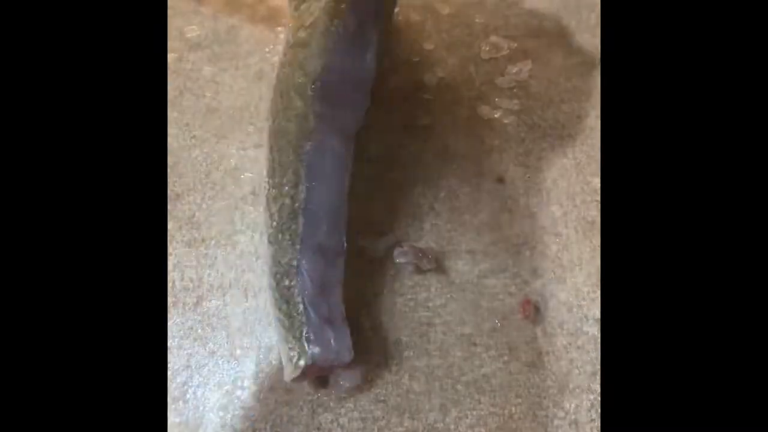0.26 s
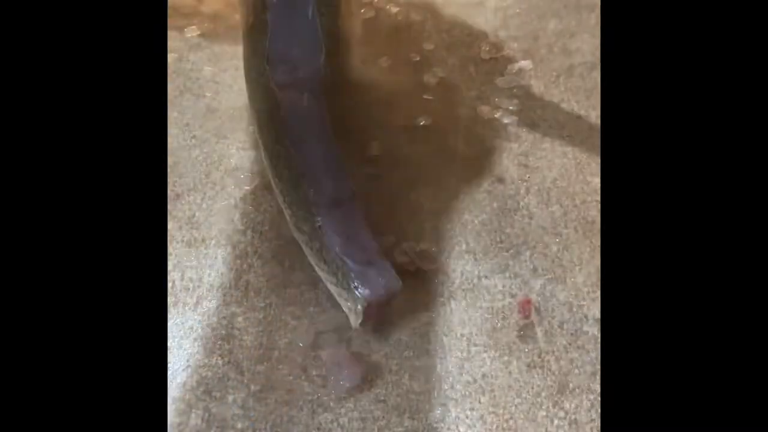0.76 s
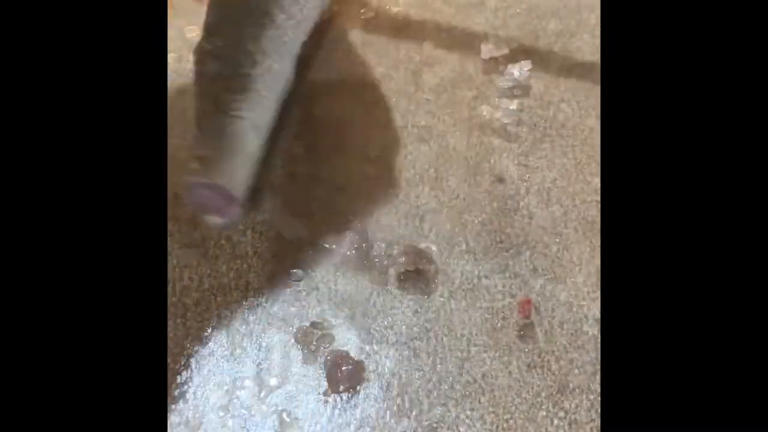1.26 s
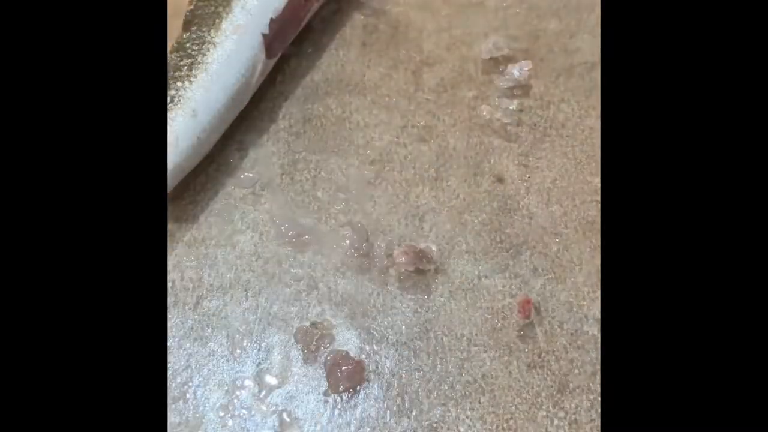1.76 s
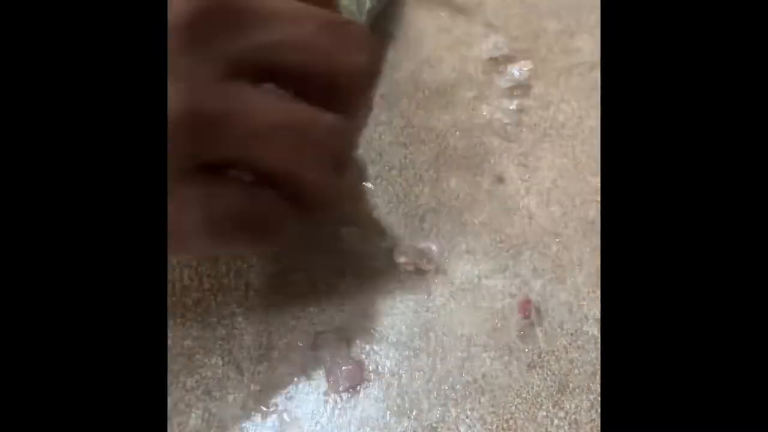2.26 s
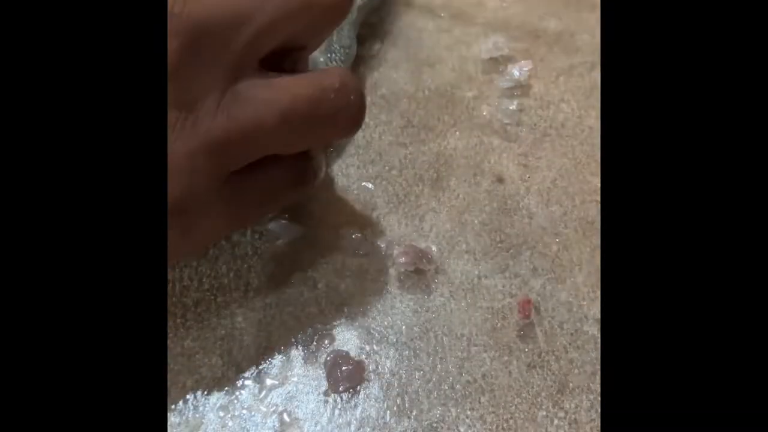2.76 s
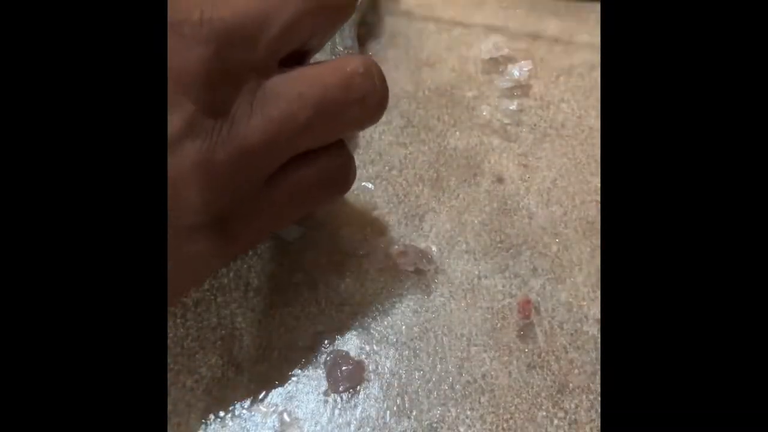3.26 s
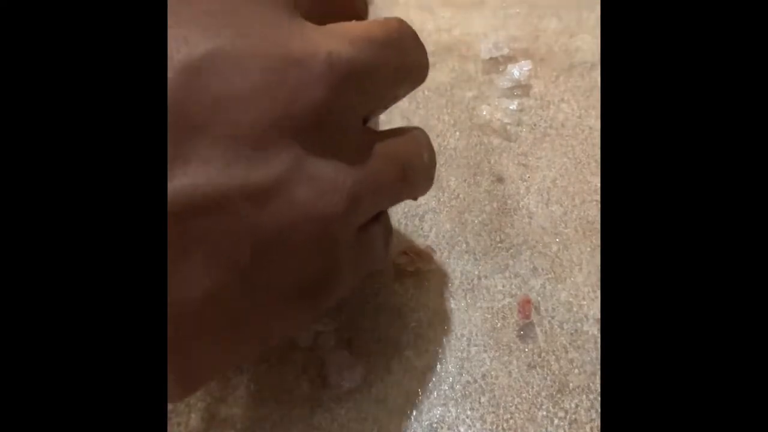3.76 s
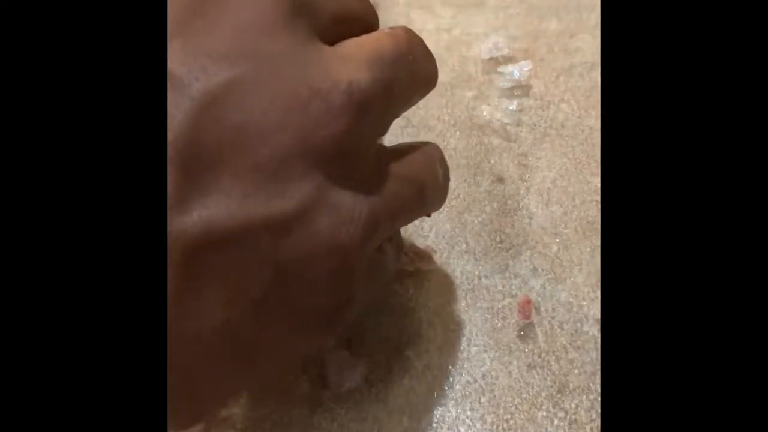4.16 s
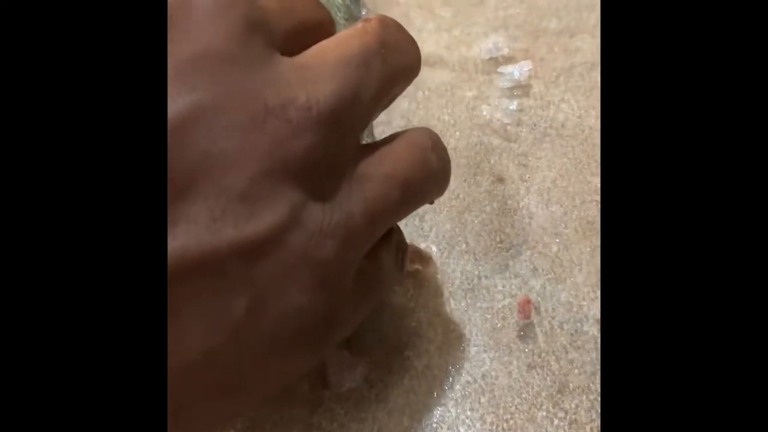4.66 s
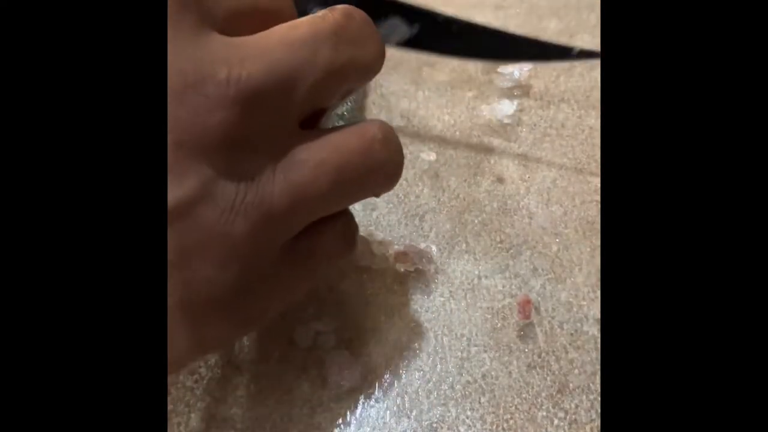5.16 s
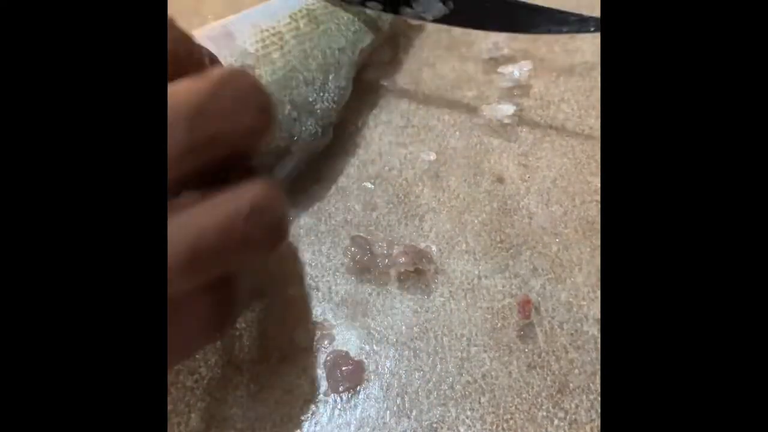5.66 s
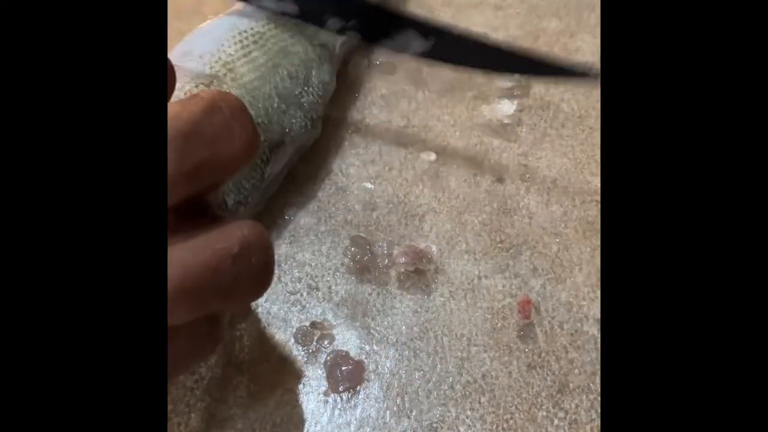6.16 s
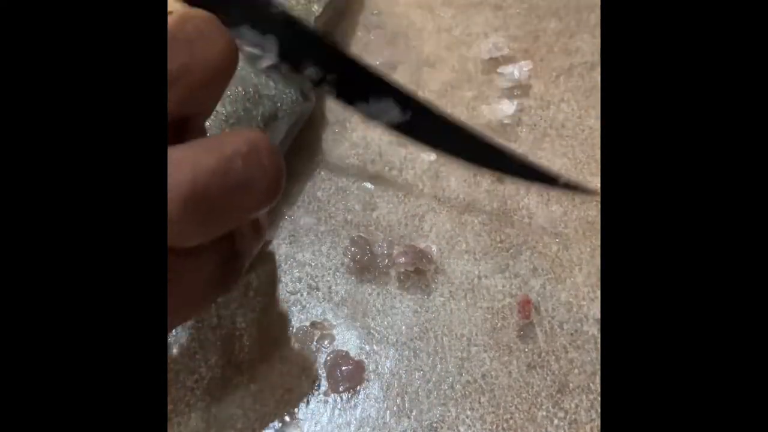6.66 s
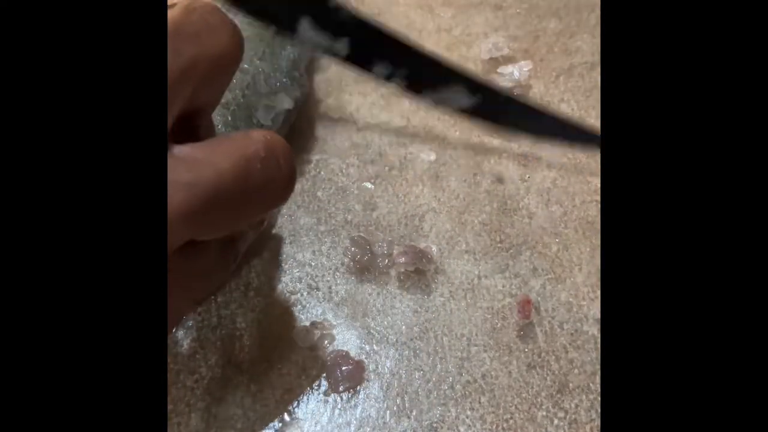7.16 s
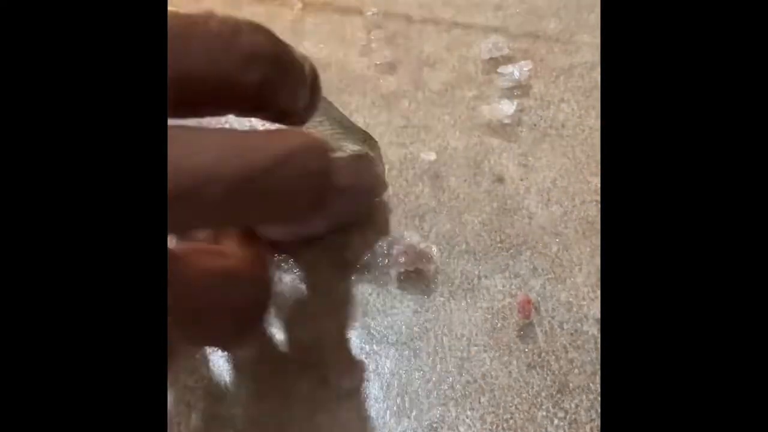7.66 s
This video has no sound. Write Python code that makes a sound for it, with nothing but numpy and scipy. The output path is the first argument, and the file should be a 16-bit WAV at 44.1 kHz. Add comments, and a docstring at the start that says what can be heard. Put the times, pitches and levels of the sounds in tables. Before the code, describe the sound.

A wet fish is handled on a kitchen counter, its skin fizzing and smacking before a dull slap. A knife then scrapes off the scales in quick, crisp strokes, each jolting the counter, with a few hollow knocks midway. Near the end the steel blade skids and rings, and the flesh squelches. A faint hum, softly running water and a briefly heard distant engine lie behind the close sounds.

```python
"""A knife scrapes the scales off a fish on a wet counter. At first a far engine drones and fades, while
an appliance hums and water runs softly throughout. Wet skin fizzes and smacks as the fish is handled, the
knife tip ticks, and the fish slaps down. From 2.5 s the edge rasps off scales, seven or eight strokes a
second, jolting the counter. Around 4 s the fish knocks hollowly and the water swells once. Near 7 s the
steel blade skids twice on the hard top and rings, and the gripped flesh squelches."""
import sys
import numpy as np
from scipy import signal
from scipy.fft import rfft, irfft, next_fast_len
from scipy.io import wavfile
from scipy.ndimage import uniform_filter1d

SR = 44100
rng = np.random.default_rng(int(sys.argv[2]) if len(sys.argv) > 2 else 0)


def dump_mix(stems):
    """Bounce the given channels to the path in sys.argv[1] as a 16-bit WAV at rate SR."""
    frames = np.atleast_2d(stems).T  # one column per channel
    limited = np.clip(frames, -1, 1)  # hard clip at full scale
    pcm = np.round(limited * 32767).astype(np.int16)
    wavfile.write(sys.argv[1], SR, pcm)


N = 348831
T = np.arange(N) / SR


def gain_of(db):
    """Turns decibels into amplitude."""
    return 10 ** (np.asarray(db) / 20)


def evened(x):
    """Scales a signal to an average power of 1."""
    return x / np.sqrt(np.mean(x ** 2) + 1e-20)


def steadied(x, size=900):
    """Holds the power near 1 over every stretch of `size` samples."""
    return x / np.sqrt(np.abs(uniform_filter1d(x ** 2, size)) + 1e-9)


def read(points, hz):
    """Reads between (frequency, value) points on a log-frequency axis."""
    f, value = np.transpose(points)
    return np.interp(np.log(hz + 1), np.log(f + 1), value)


def wander(rate):
    """Smooth random motion, up to about `rate` wiggles a second."""
    hz = np.fft.rfftfreq(N, 1 / SR)
    return evened(irfft(rfft(rng.standard_normal(N)) * np.exp(-(hz / rate) ** 2), N))


def crackle(rate, spread_db):
    """Tiny random clicks of uneven size, about `rate` a second."""
    size = gain_of(spread_db * np.minimum(rng.exponential(1, N), 4)) * rng.choice([-1, 1], N)
    return evened(size * (rng.random(N) < rate / SR))


def swells(times, lengths, dbs, edge=2):
    """Loudness curve of pushes that rise and fall; a higher edge makes them more abrupt."""
    power = np.zeros(N)
    for s, length, db in zip(times, lengths, dbs):
        near = slice(max(int((s - 2 * length) * SR), 0), int((s + 2 * length) * SR))
        power[near] += gain_of(db) ** 2 * .5 ** (abs(2 * (T[near] - s) / length) ** edge)
    return np.sqrt(power)


def pats(rows):
    """Loudness curve of sudden contacts that die away."""
    out = np.zeros(N)
    for s, decay, db in rows:
        part = out[round(s * SR):][:SR // 3]
        part += gain_of(db) * np.exp(-T[:len(part)] / decay)
    return out


def body(spectrum, modes=(), size=4096):
    """How an object answers one tap: a broad colour (Hz, dB) plus ringing notes (Hz, width in Hz, dB)."""
    hz = np.fft.rfftfreq(size, 1 / SR)
    power = gain_of(read(spectrum, hz)) ** 2
    for f, width, db in modes:
        power = power + gain_of(db) ** 2 / (1 + (2 * (hz - f) / width) ** 2)
    log_gain = np.log(np.r_[power, power[-2:0:-1]]) / 2
    response = np.fft.ifft(np.exp(np.conj(signal.hilbert(log_gain)))).real  # no sound before the tap
    return response / np.linalg.norm(response)


def convolve(x, response):
    """Plays a signal through an object's response."""
    return signal.oaconvolve(x, response)[:N]


def shifting(x, depth_db, size=11):
    """The gaps between blade, fingers and fish keep changing, so narrow resonances come and go."""
    spectra = signal.stft(x, nperseg=256, noverlap=192)[2]
    patches = rng.standard_normal(spectra.shape[::-1]).T
    patches = evened(uniform_filter1d(uniform_filter1d(patches, 2 * size, axis=1), size, axis=1))
    patches = evened(patches + np.roll(patches, 1, axis=0))
    return signal.istft(spectra * evened(gain_of(depth_db * patches)), nperseg=256, noverlap=192)[1][:N]


def diffuse(pair):
    """Makes two unrelated signals as alike as sound from all sides is at the two microphone ports."""
    a, b = rfft(pair)
    hz = np.fft.rfftfreq(pair.shape[1], 1 / SR)
    same = np.clip(read(np.array(MIC_PORTS)[:, :2], hz), -1, 1)
    return irfft(np.array([a, same * a + np.sqrt(1 - same ** 2) * b]), pair.shape[1])


def wash(spectrum):
    """Noise of a given colour, arriving from all sides."""
    response = body(spectrum)
    return evened(diffuse(np.array([convolve(rng.standard_normal(N), response) for _ in range(2)])))


def kitchen(x, early_db, late_db, early_t60=0.038, late_t60=0.2, moves_hz=1.3):
    """Adds quick echoes and a room tail that change as the hands move; t60 is seconds to fade 60 dB."""
    t = T[:SR // 5]
    turn = 2 * np.pi * moves_hz * T
    out = np.array([x, x])
    for share in (np.cos(turn), np.sin(turn)):
        response = np.zeros((2, len(t)))
        for db, t60, build_s in ((early_db, early_t60, .001), (late_db, late_t60, .012)):
            tail = diffuse(rng.standard_normal((2, len(t))))
            tail *= gain_of(-60 * t / t60) * (1 - np.exp(-t / build_s))
            response += gain_of(db) * tail / np.linalg.norm(tail[0])
        out = out + signal.oaconvolve((x * share)[None], response, axes=1)[:, :N]
    return out / np.sqrt(1 + gain_of(early_db) ** 2 + gain_of(late_db) ** 2)


# The colour of the quiet room. Each row: frequency in Hz, relative level in dB.
ROOM_COLOUR = [(25, 6), (60, -26.5), (100, 1.5), (140, 0), (230, -3.5), (320, -12), (600, -13),
               (900, -16.5), (1250, -26), (2000, -19.5), (3000, -23.5), (4500, -27.5), (9000, -30),
               (16000, -60)]
def room_tone(level_db=-56.5):
    """A faint, low rush fills the room."""
    return gain_of(level_db) * wash(ROOM_COLOUR)


# The engine's speed. Each row: time in seconds, firings a second.
ENGINE_SPEED = [(0.0, 71), (0.134, 70.3), (0.238, 75), (1.15, 73.4), (1.454, 69.2), (1.862, 69), (1.95, 68)]
# Its tones. Each row: multiple of the firing rate, relative level in dB.
ENGINE_TONES = [(2, -35), (3, -2), (4, -30.5), (5, -25.5)]
def engine(loudest_s=0.089, pass_s=1.87, level_db=-43.5, flutter_db=0.9):
    """The firings of a far engine blend into a drone that eases off and fades."""
    firing_hz = np.interp(T, *np.transpose(ENGINE_SPEED)) * (1 + 0.001 * wander(rate=20))
    turns = np.cumsum(firing_hz) / SR
    drone = sum(gain_of(db) * np.sin(2 * np.pi * round(k) * turns) for k, db in ENGINE_TONES)
    loudness = swells([loudest_s], [pass_s], [level_db]) * gain_of(flutter_db * wander(rate=32))
    return np.sqrt(2) * drone * loudness


# The appliance's tones. Each row: pitch in Hz, level in dB.
HUM_TONES = [(106.4, -56), (146, -72), (246, -68), (569, -74.5), (601, -74.5)]
# How the hum weakens. Each row: time in seconds, change in dB.
HUM_FADE = [(0, 0), (5.5, -0.5), (7.9, -3.5)]
def appliance(waver_db=1.0, drift_hz=1.0):
    """An appliance hums with a few tones that waver in loudness and pitch."""
    hum = np.zeros(N)
    for hz, db in HUM_TONES:
        loudness = gain_of(db + waver_db * wander(rate=16))
        turns = np.cumsum(hz + drift_hz * wander(rate=4.5)) / SR
        hum += loudness * np.sin(2 * np.pi * turns)
    return np.sqrt(2) * hum * gain_of(np.interp(T, *np.transpose(HUM_FADE)))


# The colour of running water. Each row: frequency in Hz, relative level in dB.
FLOW_COLOUR = [(150, -8.5), (300, 1), (480, -1.5), (680, 0), (1200, -10.5), (1900, -3.5), (3700, -14),
               (8000, -44), (16000, -33.5)]
def water(trickle_db=-70.5, gush_at_s=3.75, gush_s=0.75, gush_db=-55, splash_db=1.5):
    """Water runs softly throughout and swells once into a splashy gush."""
    gush = swells([gush_at_s], [gush_s], [gush_db], edge=0.98) * gain_of(splash_db * wander(rate=49))
    trickle = gain_of(trickle_db + 0.81 * wander(rate=17))
    return wash(FLOW_COLOUR) * np.hypot(trickle, gush)


# The fingers slip. Each row: middle in seconds, length in seconds, relative level in dB.
FINGER_SLIDES = [(0.624, 0.075, -59), (1.006, 0.26, -62.5), (1.239, 0.25, -55.5), (1.583, 0.3, -65.5),
                 (2.052, 0.23, -49.5), (2.27, 0.12, -53.5), (3.257, 1.43, -57), (5.29, 0.46, -55.5),
                 (5.796, 0.1, -54.5), (6.4, 1.4, -65), (7.068, 0.7, -63.5), (7.467, 0.12, -50),
                 (7.824, 0.16, -57)]
def sliding_skin(gain_db=-1, hold_db=-69.5, patchy_db=3, clump_db=-2.5):
    """Wet skin fizzes in sticky clumps under the holding hand, louder when it slides."""
    slip = np.hypot(gain_of(hold_db), swells(*np.transpose(FINGER_SLIDES), edge=4.5))
    fizz = slip * gain_of(gain_db + patchy_db * wander(rate=5.7)) * crackle(rate=1400, spread_db=3.5)
    clumps = evened(gain_of(clump_db * wander(rate=150)))
    fizz = shifting(fizz * clumps, depth_db=4)
    skin = body([(400, -20), (1200, -9.5), (2200, -1.5), (4000, 0), (8000, 1), (11000, 3), (15500, 4.5),
                 (16200, 0.5)], [(7520, 120, 9), (4740, 400, 0.99)])
    return kitchen(convolve(fizz, skin), early_db=-5, late_db=-16)


# The loudest single scales snapping off. Each row: time in seconds, level in dB.
SCALE_SNAPS = [(.955, -37), (2.058, -32), (2.412, -41), (2.513, -30), (2.823, -31), (2.9257, -41),
               (3.0642, -33), (3.188, -31), (3.308, -33), (3.4306, -37), (3.602, -28), (3.759, -32),
               (3.89, -31), (4.17, -32), (4.303, -40), (4.465, -36), (4.615, -30), (4.623, -30),
               (4.745, -32), (4.8598, -31.5), (4.8727, -29.5), (4.9895, -35), (5.152, -36), (5.2649, -21),
               (5.522, -23), (5.965, -43), (6.205, -39), (6.35, -35), (6.492, -35), (6.632, -35),
               (6.6934, -27), (6.812, -37)]
def snapping_scales(break_s=0.00052):
    """A stiff scale breaks free with one bright click that pings the blade."""
    s, db = np.transpose(SCALE_SNAPS)
    breaks = swells(s, np.full(len(s), break_s), db) * rng.standard_normal(N)
    ping = body([(600, -4.5), (3000, -14), (8000, 2.5), (13000, 3.5), (16000, 4)],
                [(3070, 35, 0), (3770, 64, 6)])
    return kitchen(convolve(breaks, ping), early_db=-1.5, late_db=-40)


# Wet skin smacks. Each row: start in seconds, level in dB, air pocket's pitch in Hz, its ring time in
# seconds, click level relative to the pocket in dB, tearing time in seconds.
SKIN_SMACKS = [(1.044, -40.5, 1880, 0.033, -2, 0.0084), (1.046, -38.5, 7530, 0.033, -22, 0.0076),
               (1.117, -33, 3910, 0.033, -5, 0.016), (1.482, -45.5, 4850, 0.044, 6.5, 0.012),
               (1.556, -48.5, 7160, 0.021, 2, 0.011), (1.627, -47, 3650, 0.0091, -8.5, 0.028),
               (1.924, -37.5, 4400, 0.0037, -15, 0.028), (2.175, -31.5, 4030, 0.036, -9, 0.014),
               (2.255, -43.5, 1847, 0.023, 0, 0.022), (2.285, -38.5, 4040, 0.0036, -25, 0.043),
               (2.469, -41.5, 7400, 0.029, -4.5, 0.0085), (2.725, -35.5, 1025, 0.0024, -13.5, 0.027),
               (7.42, -36.5, 2695, 0.024, -19, 0.012)]
def smacks(neighbours_db=-8, rise_per_s=0.47):
    """A film of water tears: a spatter of clicks rings an uneven air pocket with a few close notes."""
    rings, clicks, t = np.zeros(N + SR), np.zeros(N + SR), T[:SR // 4]
    snaps = crackle(rate=7100, spread_db=5)
    for s, db, hz, t60, click_db, length in SKIN_SMACKS:
        start = round(s * SR)
        tear = np.roll(snaps, start)[:len(t)] * np.exp(-t / length)
        tear *= np.sqrt(length * SR / 2) / (np.linalg.norm(tear) + 1e-9)
        fade = gain_of(-60 * t / t60)
        neighbours = sum(np.sin(2 * np.pi * hz * ratio * t) for ratio in rng.uniform(0.94, 1.03, size=3))
        pocket = np.sin(2 * np.pi * hz * t * (1 + rise_per_s * t))
        pocket += gain_of(neighbours_db) * fade * neighbours
        ring = signal.fftconvolve(tear, pocket * fade)[:len(t)]
        rings[start:start + len(t)] += gain_of(db) * ring / abs(ring).max()
        clicks[start:start + len(t)] += gain_of(db + click_db) * tear
    film = body([(200, -39), (700, 0), (1050, -15), (1500, 10), (2500, -17), (4200, 19), (8000, 14),
                 (12000, 25), (16000, -8)])
    return kitchen(rings[:N] + convolve(clicks[:N], film), early_db=-5, late_db=-17)


# The blade's faint notes when flesh damps it. Each row: pitch in Hz, width in Hz, relative level in dB.
DAMPED_NOTES = [(2922, 26, 18), (3150, 90, 9.5), (3740, 90, 11), (4255, 70, 8), (4640, 110, 7.5),
                (5450, 200, 2), (6520, 150, 6), (7500, 170, 12.5)]
# The tip touches down and bounces. Each row: time in seconds, strength in dB.
TIP_TOUCHES = [(1.3273, -5.5), (1.3308, -11.5)]
def tip_ticks(damping_t60=0.2):
    """The tip meets the counter: a dry tick that leaves a thin ring in the hand-damped blade."""
    touches = np.zeros(N)
    for s, db in TIP_TOUCHES:
        touches[round(s * SR)] = gain_of(db)
    steel = body([(300, -7), (1150, -11), (1500, -1.5), (2500, 1.5), (2750, -17), (3250, 4), (3580, 9),
                  (4000, 1), (5000, -5), (16000, 1)], DAMPED_NOTES)
    softness = body([(300, -2), (4300, 1.5), (5500, -7), (6600, -7), (7500, -25), (9000, -12),
                     (16000, -15)])
    tick = signal.fftconvolve(steel, softness)
    tick *= gain_of(-60 * T[:len(tick)] / damping_t60)
    return kitchen(convolve(touches, tick / np.linalg.norm(tick)), early_db=-9, late_db=-20)


# Fish and hand bump the counter. Each row: middle in seconds, length in seconds, level in dB.
COUNTER_BUMPS = [(1.346, 0.046, -49.5), (1.938, 0.017, -48), (2.765, 0.026, -57), (3.921, 0.035, -36),
                 (6.984, 0.021, -40)]
def bumps():
    """Loudness curve of the bumps, which sound through the rubbing flesh and the jolted counter."""
    return swells(*np.transpose(COUNTER_BUMPS))


# The fish lands. Each row: start in seconds, fade time in seconds, level in dB.
FISH_SLAPS = [(1.826, 0.011, -37), (3.603, 0.0062, -36)]
# The colour of a slap. Each row: frequency in Hz, relative level in dB.
SLAP_COLOUR = [(40, -46), (200, -12), (330, 3), (450, -1), (570, 12), (800, -2), (1100, -17), (1500, -4),
               (2500, -19), (8000, -20), (16000, -20)]
def slaps():
    """The limp fish lands on the wet counter with a dull slap."""
    noise = steadied(convolve(rng.standard_normal(N), body(SLAP_COLOUR)))
    return kitchen(noise * pats(FISH_SLAPS), early_db=0, late_db=-17)


# The knife strokes. Each row: middle in seconds, base length in seconds, then four levels in dB:
# rasp of the scales, boost of its treble, rub of the flesh, jolt of the counter.
KNIFE_STROKES = [(2.529, 0.032, -47, 5.5, -52, -42.5), (2.679, 0.022, -42.5, 4, -48.5, -36),
                 (2.834, 0.023, -41.5, 0.5, -49.5, -41.5), (2.949, 0.023, -38, -0.5, -47, -41),
                 (3.072, 0.023, -38.5, -20, -44.5, -38), (3.192, 0.026, -38.5, -6, -46, -40.5),
                 (3.317, 0.03, -40.5, 0, -50.5, -39), (3.451, 0.026, -41, -1.5, -50, -40),
                 (3.603, 0.025, -43, -1, -44, -36), (3.766, 0.024, -45, 5.5, -61, -35),
                 (4.054, 0.026, -42.5, 0, -47.5, -38.5), (4.179, 0.024, -40, -3, -43, -37),
                 (4.318, 0.031, -42, -1.5, -48, -36), (4.479, 0.028, -47, -5, -53.5, -37.5),
                 (4.632, 0.027, -39.5, -2.5, -43, -45.5), (4.759, .027, -38, -10, -46.5, -47),
                 (4.882, 0.028, -36, -7, -45.5, -43.5), (5.006, 0.032, -39, -10, -55, -44),
                 (5.132, 0.029, -43, 0, -53, -41.5), (5.261, 0.029, -42, -1.5, -49.5, -45),
                 (5.384, 0.023, -40, -3, -53.5, -42.5), (5.504, 0.023, -43, 2, -62, -41.5),
                 (5.795, 0.063, -54.5, 1, -63, -56.5), (6.084, 0.03, -50.5, -5, -58, -57),
                 (6.225, 0.026, -46.5, -5, -54.5, -49.5), (6.364, 0.027, -43, -11, -53.5, -46),
                 (6.513, 0.033, -44.5, -6, -58, -51.5), (6.661, 0.043, -48.5, -5, -57, -49),
                 (6.829, 0.028, -42, -10, -50.5, -43.5), (6.953, 0.032, -37, -6, -50.5, -48.5),
                 (7.081, 0.023, -41, -4, -51.5, -44), (7.204, 0.018, -44.5, 4.5, -54, -43)]
# The colour of the rasp. Each row: frequency in Hz, relative level in dB.
RASP_COLOUR = [(900, -2), (1600, 8), (2200, 8), (2750, 0), (3400, 7), (4000, -1), (4400, 7), (5100, 1.5),
               (5700, 7), (8000, 4), (10000, 9.5), (12500, 7), (15300, 12.5), (16200, 0.5)]
def rasping_scales(rows_per_s=190, back_lag_s=0.075, back_db=-18):
    """The edge catches row after row of scales in quick uneven bursts; the return stroke only brushes."""
    s, length, rasp_db, treble_db, _, _ = np.transpose(KNIFE_STROKES)
    flicks = swells(s, length * 1.09, rasp_db, edge=3.53)
    brushes = swells(s + back_lag_s, length * 0.9, rasp_db + back_db)
    rows_passed = np.cumsum(rows_per_s * (1 + 0.29 * wander(rate=58.4))) / SR
    bursts = evened(gain_of(3.6 * np.cos(2 * np.pi * rows_passed)))
    grit = bursts * crackle(rate=5200, spread_db=3.85)
    rasp = shifting(convolve((flicks + brushes) * grit, body(RASP_COLOUR, DAMPED_NOTES)), depth_db=2.8)
    treble = signal.sosfilt(signal.butter(2, 9000, "highpass", fs=SR, output="sos"), rasp)
    treble = signal.sosfilt(signal.butter(2, 9000, "highpass", fs=SR, output="sos"), treble[::-1])[::-1]
    rasp += treble * (gain_of(np.interp(T, s, treble_db)) - 1)
    return kitchen(rasp, early_db=-6, late_db=-30)


# The fish shifts on the wet counter. Each row: middle in seconds, length in seconds, level in dB.
FISH_SHIFTS = [(3.95, .18, -56), (4.71, .14, -54)]
# The colour of rubbed flesh. Each row: frequency in Hz, relative level in dB.
RUB_COLOUR = [(60, -36), (200, 10.5), (360, 1), (500, -10), (660, 7.5), (850, -21), (1150, -19),
              (1500, -0.5), (2200, -44), (4000, -26)]
def rubbing_flesh(drag_lag_s=0.0022, creep_lag_s=0.075, creep_s=0.054, creep_db=-14):
    """Each stroke drags the flesh, which then creeps back; shifts and bumps rub it too."""
    s, length, _, _, rub_db, _ = np.transpose(KNIFE_STROKES)
    drag = swells(s + drag_lag_s, length * 1.27, rub_db, edge=7.4)
    creep = swells(s + creep_lag_s, np.full(len(s), creep_s), rub_db + creep_db)
    creep += swells(*np.transpose(FISH_SHIFTS))
    loudness = drag + creep * gain_of(0.69 * wander(rate=26.6)) + gain_of(-20) * bumps()
    flesh = body(RUB_COLOUR, [(683, 66, 8.2), (391, 24, 7.8), (916, 15.4, 4.4)])
    rub = steadied(convolve(crackle(rate=3000, spread_db=5.5), flesh))
    return kitchen(loudness * rub, early_db=-10.5, late_db=-30)


# The colour of the counter's thud. Each row: frequency in Hz, relative level in dB.
COUNTER_COLOUR = [(40, -35), (80, -24.5), (115, -2.5), (150, 8.5), (200, -1), (250, -14), (320, -24),
                  (600, -26.5), (1500, -43.5)]
def counter_jolts(push_lag_s=0.011, back_lag_s=0.075, back_db=-10):
    """The counter thuds with each bump and stroke, and shakes more gently on the return."""
    s, length, _, _, _, jolt_db = np.transpose(KNIFE_STROKES)
    push = swells(s + push_lag_s, length * 1.36, jolt_db, edge=3.26)
    shake = swells(s + back_lag_s, length * 1.46, jolt_db + back_db)
    rumble = steadied(convolve(rng.standard_normal(N), body(COUNTER_COLOUR)), size=700)
    return (push + shake + bumps()) * rumble


def loose_scales(gain_db=-13, between_db=-14):
    """Single scales come free with crisp ticks, loudest under the edge and faint between strokes."""
    s, length, rasp_db = np.transpose(KNIFE_STROKES)[:3]
    loudness = swells(s, length, rasp_db) + swells(s, length * 5, rasp_db + between_db)
    ticks = loudness * crackle(rate=160, spread_db=4)
    colour = body([(600, -11), (2000, -2), (3500, -15), (7500, -7), (11000, 1), (15500, -15),
                   (16200, 17.5)], [(3020, 35, 6), (7650, 86, 10)])
    return gain_of(gain_db) * kitchen(convolve(ticks, colour), early_db=-12, late_db=-19)


# The fish is pressed down and knocks. Each row: start in seconds, level in dB.
FISH_KNOCKS = [(3.598, -46), (3.76, -27), (3.865, -21.5), (3.899, -41), (4.168, -32.5), (4.618, -32)]
# Its hollow notes. Each row: the pitch it settles on in Hz, relative level in dB.
HOLLOW_NOTES = [(145, -1.5), (370, -15.5), (560, -20.5), (690, -24)]
def knocks(swell_s=0.0077, sag=1.41, sag_s=0.00365):
    """The soft body meets the counter: a short hollow thud whose pitch drops as the flesh spreads."""
    out, t = np.zeros(N), T[:SR // 10]
    turns_per_hz = np.cumsum(1 + sag * np.exp(-t / sag_s)) / SR
    push = (t / swell_s * np.exp(1 - t / swell_s)) ** 2
    for s, db in FISH_KNOCKS:
        ring = sum(gain_of(note_db) * np.sin(2 * np.pi * (hz * turns_per_hz + rng.random()))
                   for hz, note_db in HOLLOW_NOTES)
        out[round(s * SR):][:len(t)] += gain_of(db) * push * ring
    return out


# The blade chatters along the counter. Each row: start in seconds, length in seconds,
# relative level in dB, share of sliding (0 only catches, 1 only slides).
BLADE_SKIDS = [(6.9205, 0.0039, -19, 0.3), (6.9279, 0.0045, -24.5, 0.4), (6.9316, 0.0076, -16, 0.6),
               (7.2805, 0.0042, -9.5, 0.4), (7.291, 0.0026, -32, 0), (7.297, 0.0017, -15, 0.9),
               (7.3013, 0.0018, -9, 1), (7.3056, 0.004, -12, 1), (7.3113, 0.0032, -17, 0.5)]
# The steel's notes. Each row: pitch in Hz, width in Hz (wider dies sooner), then three relative
# levels in dB: when it catches, when it slides, and ringing on once it lifts.
STEEL_NOTES = [(653, 50, -15.5, -20, -28), (900, 60, -20, -19, -30), (1500, 130, -23, -21, -34),
               (2110, 70, -4, -12, -25), (2285, 70, -3, -10, -20), (2480, 70, -10, -13, -26),
               (2597, 60, -9, -11, -28), (2922, 45, -5, -9, -22), (3150, 55, -6, -12, -18),
               (3760, 110, -13, -9, -30), (4255, 60, 0, -8, -29), (4470, 70, -1, 3, -25),
               (4645, 70, -10, -1, -18), (4850, 55, -7, -7, -14), (5030, 70, -12, -8, -14),
               (5320, 80, -14, -11, -26), (5680, 70, -14, -9, -22), (5920, 100, -6, -10, -28),
               (7095, 55, -9, -8, -15), (7550, 70, -15, -8, -25), (8700, 110, -12, -16, -24),
               (8950, 100, -8, -16, -20), (10300, 110, -23, -18, -18), (11650, 200, -13, -20, -34),
               (14900, 300, -10, -11, -34)]
def skidding_blade(gain_db=-5, catch_s=0.001, lifted_t60=0.12, uneven_db=2, rattle_s=0.015):
    """Steel catches and slips on the hard top: each slip rings the blade, rattles and grinds."""
    grip, sliding_share = np.zeros(N), np.zeros(N)
    for s, length, db, share in BLADE_SKIDS:
        grip += gain_of(db) * np.clip((T - s) / catch_s + .5, 0, 1) * (T < s + length)
        sliding_share[T > s - catch_s] = share
    span = slice(np.argmax(grip > 0), N)
    t, share, ring = T[span], sliding_share[span], np.zeros(N)
    for hz, width, catch_db, slide_db, lifted_db in STEEL_NOTES:
        jitter, uneven = rng.standard_normal((2, len(t)))
        flicker_db = uneven_db * evened(uniform_filter1d(uneven, size=200))
        fed = (grip[span] * gain_of(catch_db * (1 - share) + slide_db * share + flicker_db)) ** 2
        # The power fed in dies quickly while the blade is held down, slowly once it lifts.
        held, lifted = np.exp(-2 * np.pi * width / SR), gain_of(-120 / (lifted_t60 * SR))
        power = signal.lfilter([1 - held], [1, -held], fed)
        power += gain_of(lifted_db) ** 2 * signal.lfilter([1 - held], [1, -lifted], fed)
        turns = hz * t + np.cumsum(0.011 * jitter * (fed > 0)) + rng.random()  # contact jostles the note
        ring[span] += np.sqrt(power) * np.sin(2 * np.pi * turns)
    releases = pats([(s + length, rattle_s, db) for s, length, db, _ in BLADE_SKIDS])
    rattle_colour = body([(200, -14), (700, 2), (1400, -1.5), (2500, -5), (4600, 0), (7000, 7),
                          (11000, -5), (16000, -16)])
    rattle = convolve(releases * crackle(rate=2700, spread_db=0), rattle_colour)
    grain = body([(50, -50), (250, -20), (550, -7.5), (1200, -7.5), (2200, -2.5), (3300, -3), (5200, 6),
                  (7200, -4), (10000, 6), (12500, 9), (15300, -2), (16200, -10)])
    grind = convolve(grip * steadied(crackle(rate=1300, spread_db=-1.5), size=100), grain)
    skid = gain_of(-0.2) * ring + gain_of(-6) * grind + gain_of(-20) * rattle
    return gain_of(gain_db) * kitchen(skid, early_db=-16, late_db=-30, early_t60=0.048, late_t60=0.17)


# The grip tightens. Each row: start in seconds, fade time in seconds, level in dB.
SQUEEZES = [(7.025, 0.16, -53), (7.187, 0.023, -45.5), (7.229, 0.034, -53), (7.42, 0.23, -51),
            (7.508, 0.0078, -48), (7.857, 0.068, -48)]
# The colour of a squelch. Each row: frequency in Hz, relative level in dB.
SQUELCH_COLOUR = [(300, 1), (900, -2), (1500, 1), (2000, -0.5), (2700, 1.5), (3500, -7), (5000, -5),
                  (9000, -14.5), (16000, -27)]
def squelches():
    """Gripped flesh oozes with a short, crackly squelch."""
    ooze = pats(SQUEEZES) * crackle(rate=3500, spread_db=3.5)
    return kitchen(convolve(ooze, body(SQUELCH_COLOUR)), early_db=0, late_db=-17)


def scene():
    """Adds up the background, the handled fish and the work of the knife."""
    background = room_tone() + engine() + appliance() + water()
    fish = sliding_skin() + smacks() + slaps() + knocks() + squelches()
    scraping = snapping_scales() + rasping_scales() + rubbing_flesh() + counter_jolts() + loose_scales()
    return background + fish + scraping + tip_ticks() + skidding_blade()


# The phone's two microphone openings. Each row: frequency in Hz, how alike they hear the room (0 to 1),
# how far the left one leads in radians, left minus right level in dB.
MIC_PORTS = [(197.3, 0.87, 0.16, -1.3), (656, 0.77, 0.1, -1.5), (1260, 0.12, 1.3, -0.1),
             (2970, 0.082, 0.59, -0.5), (4700, 0.14, 0.93, -2), (4660, .2, 1.5, -2),
             (7400, 0.19, 1.64, -0.5), (8780, 0.28, 1.38, -0.5), (10700, 0.82, 3.39, 0),
             (11380, 0.9, 3.29, 0.5), (14400, 0.83, 5, -0.5), (16300, 0.57, 4.7, 2)]
def record(dry, low_cut_hz=65, high_cut_hz=16100):
    """A nearby phone listens: its right port lags in the treble; deep bass and the very top are lost."""
    size = next_fast_len(N + SR)
    hz = np.fft.rfftfreq(size, 1 / SR)
    f, _, lead, left_db = np.transpose(MIC_PORTS)
    lag = read(np.c_[f, lead], hz)
    tilt = gain_of(read(np.c_[f, left_db], hz) / 2)
    pair = irfft(rfft(dry, size) * np.array([tilt, np.exp(-1j * lag) / tilt]), size)[:, :N]
    pair = signal.sosfilt(signal.butter(3, low_cut_hz, "highpass", fs=SR, output="sos"), pair)
    high_cut = signal.firwin(255, high_cut_hz, window=("kaiser", 9), fs=SR)
    return signal.oaconvolve(pair, high_cut[None], "same")


dry = scene()
out = record(dry)
dump_mix(out)
```